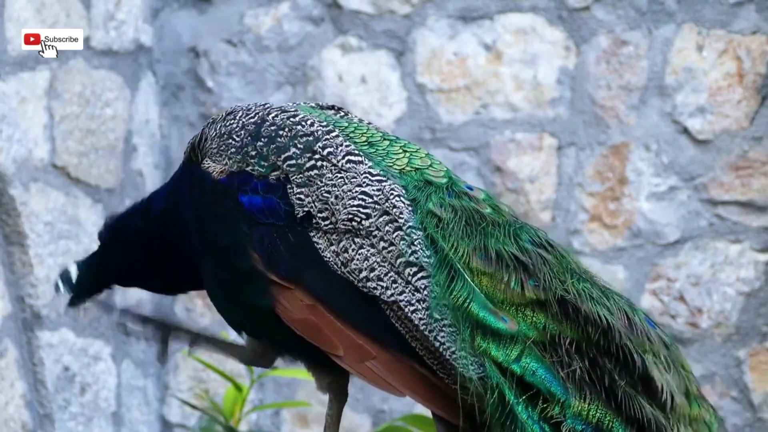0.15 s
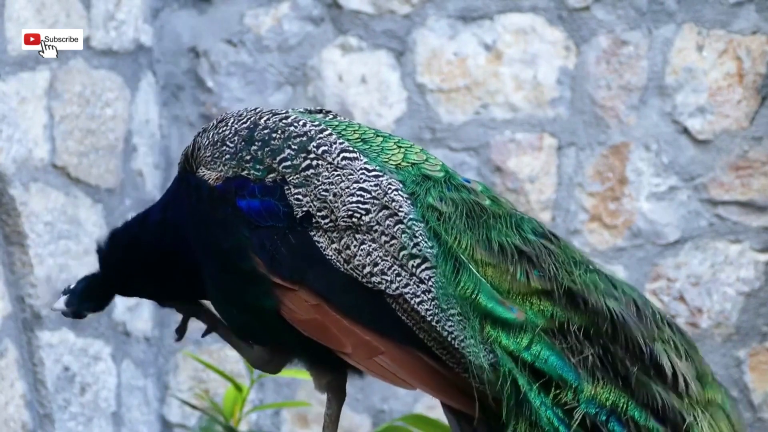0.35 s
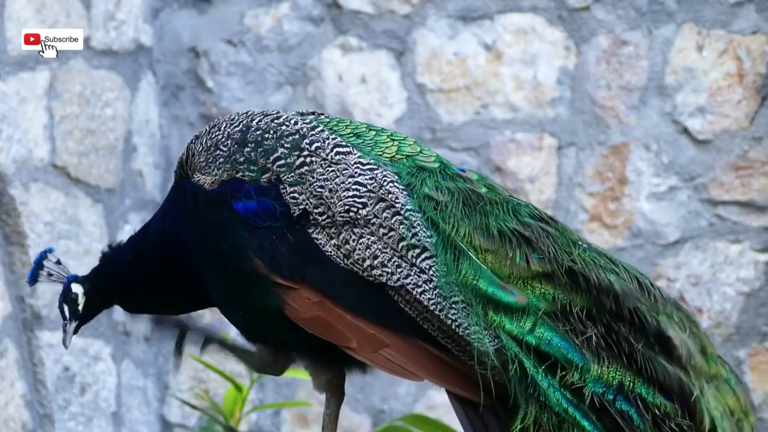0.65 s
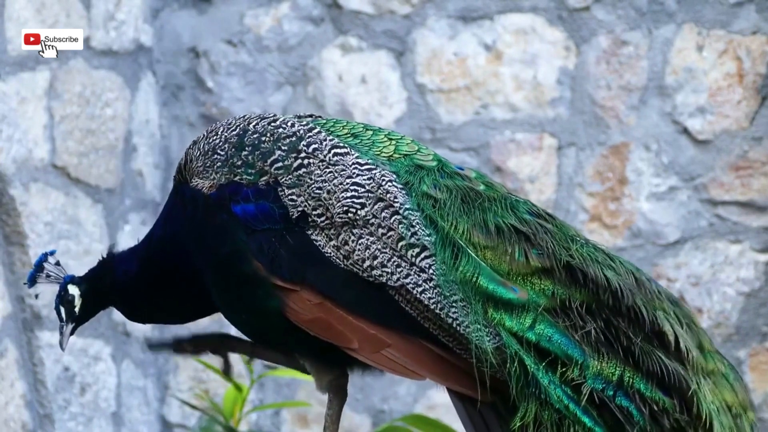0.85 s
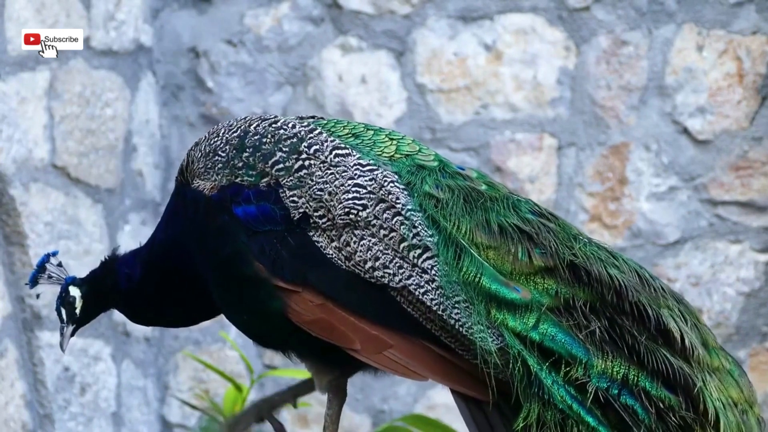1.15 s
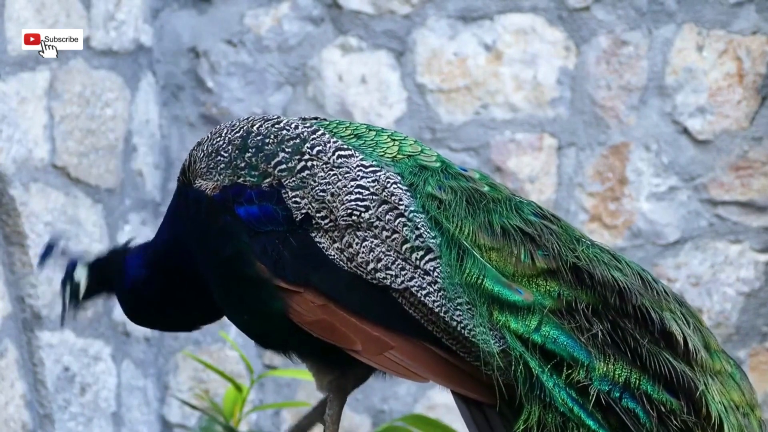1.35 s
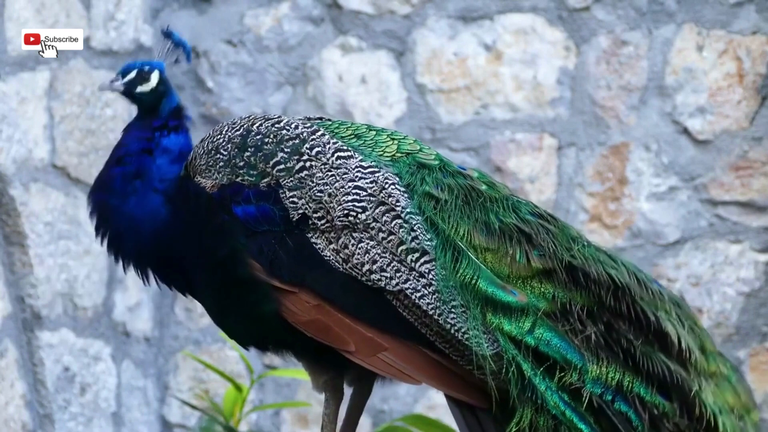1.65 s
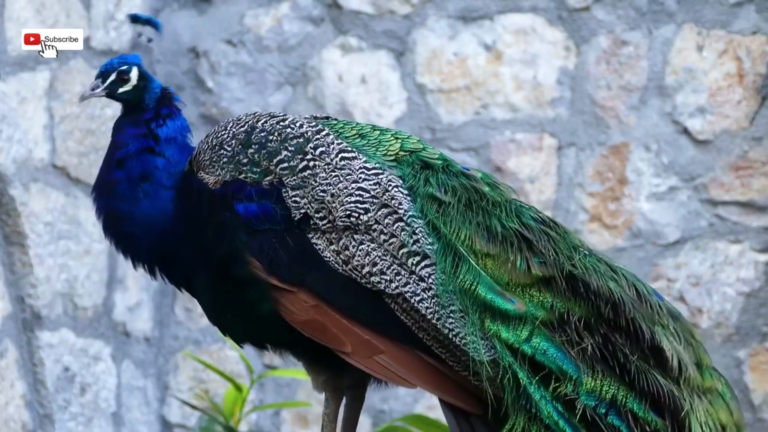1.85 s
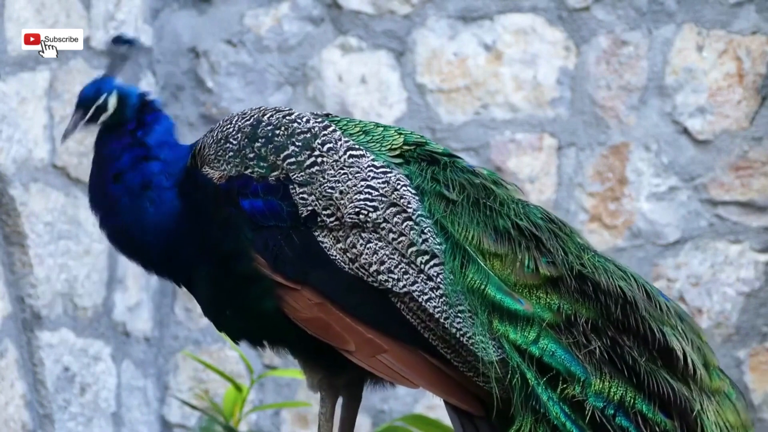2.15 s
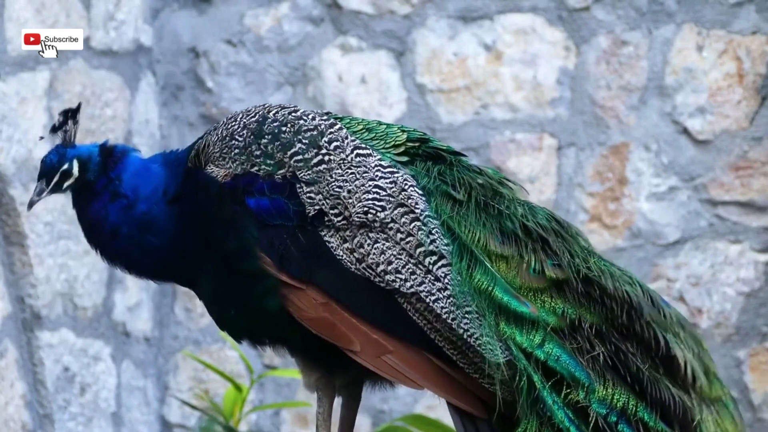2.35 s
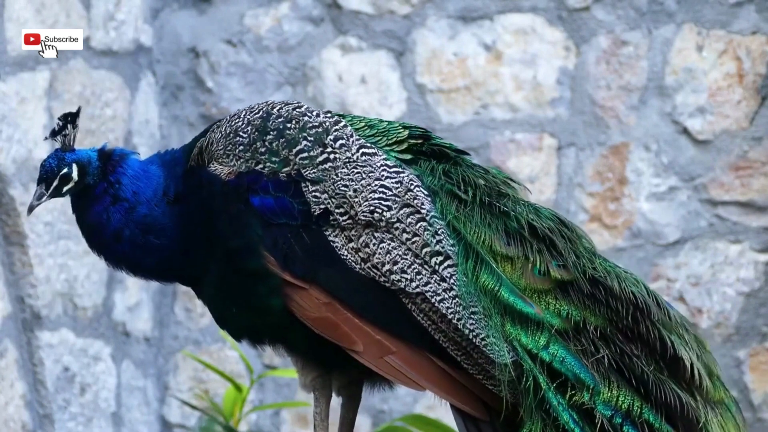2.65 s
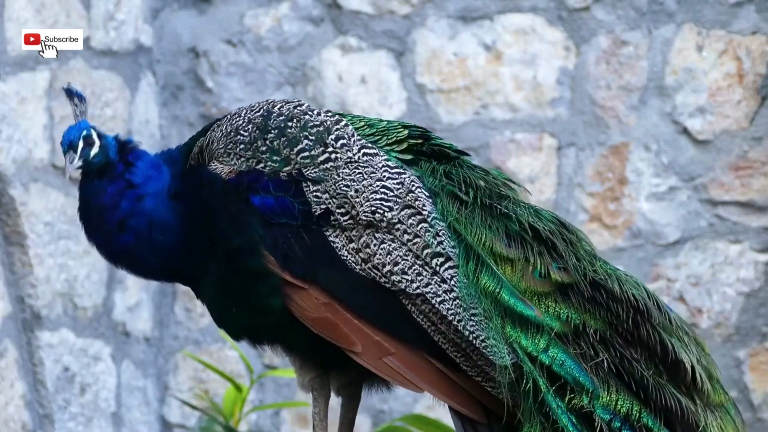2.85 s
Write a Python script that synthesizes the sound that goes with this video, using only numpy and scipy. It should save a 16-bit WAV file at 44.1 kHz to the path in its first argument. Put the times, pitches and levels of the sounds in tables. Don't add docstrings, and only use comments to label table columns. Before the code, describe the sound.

Two shrill arching peacock screams ring through a walled yard over faint traffic and birds

```python
import sys
import numpy as np
from scipy import signal
from scipy.fft import rfft, irfft, next_fast_len
from scipy.io import wavfile
from scipy.ndimage import uniform_filter1d, minimum_filter1d

SR = 44100
rng = np.random.default_rng(int(sys.argv[2]) if len(sys.argv) > 2 else 0)


def wav_record(signal):
    frames = np.transpose(np.atleast_2d(signal))
    bounded = np.clip(frames, -1, 1)
    quanta = np.round(bounded * 32767).astype(np.int16)
    wavfile.write(sys.argv[1], SR, quanta)


def volts_from_db(level):
    exponent = np.asarray(level, float) / 20
    return 10 ** exponent


N = 132300

# time [s], level [dB].
LEAF_SWELL = [(0, -68), (.95, -64), (1.3, -55.5), (1.75, -52), (2.0, -54), (2.8, -67), (3, -79)]


def evened(x):
    return x / np.sqrt(np.mean(x ** 2) + 1e-20)


def read(points, hz):
    f, value = np.transpose(points)
    return np.interp(np.log(hz + 1), np.log(f + 1), value)


def curve(points):
    return volts_from_db(np.interp(np.arange(N) / SR, *np.transpose(points)))


def add(mix, s, sound):
    part = mix[round(s * SR):][:len(sound)]
    part += sound[:len(part)]


def wander(count, size):
    return evened(uniform_filter1d(uniform_filter1d(rng.standard_normal(count), size), size))


def band(x, hz, width):
    f = np.fft.rfftfreq(len(x), 1 / SR)
    return evened(irfft(rfft(x) * np.exp(-2 * ((f - hz) / width) ** 2), len(x)))


def colour(x, points):
    size = next_fast_len(len(x) + 4096)
    gain = volts_from_db(read(points, np.fft.rfftfreq(size, 1 / SR)))
    return irfft(rfft(x, size) * gain, size)[:len(x)]


def hanging_cry():
    # frequency [Hz], width [Hz], level [dB].
    partials = [(2450, 50, -8), (2640, 30, -6), (2850, 40, -8), (3100, 40, -7), (3215, 45, -2),
                (3530, 40, -1), (3880, 40, -12), (4090, 40, -14)]
    level_db, t60_s, wash_db = -22.5, 0.81, -9.5
    noise = rng.standard_normal(N)
    lines = evened(sum(volts_from_db(db) * band(noise, hz, width) for hz, width, db in partials))
    wash = volts_from_db(wash_db) * band(rng.standard_normal(N), 2900, 1800)
    return (lines + wash) * volts_from_db(level_db - 60 * np.arange(N) / SR / t60_s)


def traffic():
    # frequency [Hz], density [dB per Hz].
    rumble = [(25, -28), (55, 3), (100, -8.5), (200, -4), (500, -13), (2500, -23.5), (6000, -40.5),
              (12000, -75)]
    frames, hz = N // 256 + 5, np.fft.rfftfreq(1024, 1 / SR)
    real, imag, patches = rng.standard_normal((frames, 513, 3)).T
    patches = uniform_filter1d(patches, size=8, axis=0)
    patches = evened(uniform_filter1d(patches, size=12, axis=1))
    level_db = read(rumble, hz)[:, None] + 1.15 * patches + 0.52 * wander(frames, size=20)
    z = (real + 1j * imag) * volts_from_db(level_db)
    return volts_from_db(-31) * evened(signal.istft(z, nperseg=1024, noverlap=768)[1][:N])


def hum():
    # time [s], level [dB].
    swell = [(0, -39.5), (.06, -39.5), (.3, -46.5), (1.2, -39.5), (1.3, -36), (1.55, -49.5), (1.82, -32),
             (1.92, -35.5), (2.04, -29.5), (2.3, -38.5), (2.85, -37), (3, -33.5)]
    centre_hz, waver_hz = 166, 4
    turns = np.cumsum(centre_hz + waver_hz * wander(N, size=1500)) / SR
    return curve(swell) * np.sqrt(2) * np.sin(2 * np.pi * turns)


def leaves():
    return curve(LEAF_SWELL) * band(rng.standard_normal(N), 7400, 1500)


def whistle(length, hz, glide, db):
    u = np.linspace(0, 1, round(length * SR))
    turns = np.cumsum(hz + glide * (u - .5)) / SR
    return volts_from_db(db) * np.sin(np.pi * u) ** .5 * np.sin(2 * np.pi * turns)


def far_flock():
    # time [s], level [dB].
    chatter = [(0, -59.5), (.95, -55.5), (1.2, -41), (1.65, -41.5), (1.85, -45.5), (2.05, -44.5),
               (2.8, -54.5), (3, -52)]
    low_hz, high_hz = 2500, 4610
    blur = np.zeros(N)
    for when, length, pitch, glide, loudness in rng.random((2400, 5)):
        hz = low_hz + (high_hz - low_hz) * pitch
        note = whistle(.015 + .04 * length, hz, 120 * (glide - .6), 9 * loudness ** 3)
        add(blur, when * N / SR, note)
    return curve(chatter) * evened(blur)


def cry(rows, throat, pipe):
    attack_s, release_s = 0.0068, 0.02
    jitter, shimmer_db, breath_db = 0.00096, 1.5, -39
    s, pitch, effort_db, even_db, tilt_db = np.transpose(rows)
    t = np.arange(s[0], s[-1], 1 / SR)
    n = len(t)
    hz = uniform_filter1d(np.interp(t, s, pitch), size=1300, mode="nearest")
    hz = hz * (1 + jitter * wander(n, size=150))
    turns, out = np.cumsum(hz) / SR, np.zeros(n)
    even_db, tilt_db = np.interp(t, s, even_db), np.interp(t, s, tilt_db)
    for k in range(1, 21):
        level_db = sum(db / (1 + (2 * (k * hz - f) / width) ** 2) for f, width, db in pipe)
        level_db = level_db + even_db * (k in (2, 4)) + tilt_db * np.log2(max(k, 3) / 3)
        breath = volts_from_db(breath_db) * wander(n, size=40)
        level_db = read(throat, k * hz) + level_db + shimmer_db * wander(n, size=500)
        out += (1 + breath) * volts_from_db(level_db) * np.sin(2 * np.pi * (k * turns + rng.random()))
    out /= np.sqrt(uniform_filter1d(out ** 2, size=3000))
    edge = np.clip(np.minimum((t - s[0]) / attack_s, (s[-1] - t) / release_s), 0, 1)
    return s[0], out * edge * volts_from_db(np.interp(t, s, effort_db))


def yard(x):
    # delay [s], level [dB].
    slaps = [
        (.0063, -29.5),
        (.0131, -11),
        (.0212, -10),
        (.034, -16.5),
        (.050, -10.5),
        (0.077, -17.5),
    ]
    # frequency [Hz], t60 [s].
    decay = [(600, 2.1), (1500, 2.7), (2500, 1.34), (4000, 1.5), (6000, 0.29), (10000, 1)]
    # frequency [Hz], level [dB].
    stone = [(600, -31), (1400, -8), (2500, -3.5), (4000, 0.5), (6000, 0), (12000, -11)]
    near_db, near_t60_s, near_end_s, near_share = -12, .6, .075, .12
    far_db = -19.5
    size = 2 * SR
    time = np.arange(size) / SR
    taps = np.zeros(size)
    at = np.arange(300, size - 20, 20) + rng.integers(0, 20, (size - 301) // 20)
    taps[at] = rng.choice([-1., 1.], at.shape)
    near = taps * (rng.random(size) < near_share) * volts_from_db(-60 * time / near_t60_s)
    near = near / (1 + (time / near_end_s) ** 8)
    hz, t, z = signal.stft(taps, SR, nperseg=256)
    z = z * volts_from_db(-60 * t / read(decay, hz)[:, None])
    far = signal.istft(z, SR, nperseg=256)[1][:size]
    echo = volts_from_db(near_db) * near / np.linalg.norm(near) + volts_from_db(far_db) * far / np.linalg.norm(far)
    for s, db in slaps:
        echo[round(s * SR)] += volts_from_db(db)
    echo = colour(np.roll(echo, 200), stone)
    return x + signal.fftconvolve(x, echo)[200:N + 200]


def songbirds():
    # start [s], length [s], pitch [Hz], glide [Hz], level [dB].
    song = [(1.04, .03, 5900, -100, -63), (1.304, .06, 2460, -28, -41), (1.386, .025, 4100, -400, -33),
            (1.41, .04, 3500, 11.5, -37), (1.475, .05, 3490, 22, -32), (1.54, .02, 4380, 10, -45),
            (1.566, .03, 3300, -61, -37.5), (1.627, .05, 3080, 1.5, -34.5), (1.705, .035, 3070, -12, -47),
            (1.86, .03, 2850, 117, -37), (1.969, .02, 3650, 49.5, -34), (1.978, .02, 4080, 15.5, -46),
            (2.001, .025, 2750, -300, -30.5)]
    out = np.zeros(N)
    for s, length, hz, glide, db in song:
        add(out, s, whistle(length, hz, glide, db - 3))
    return out


def scene():
    # time [s], pitch [Hz], effort [dB], even-harmonic lift [dB], brightness [dB per octave].
    cries = [
        [(.185, 637.6, -20, 3.5, -10), (.25, 706, -9.5, 3.5, 2), (.345, 798.7, -6, -6, -0.5),
         (.42, 819, -1.5, -14, 3), (.511, 822, -.5, -16, -3.6), (.617, 808.1, -4.5, -2, 2.6),
         (.765, 716.4, -12, -1.5, -2), (.805, 669, -9, 4.5, -4), (.83, 590, -17, 7.5, -5.5)],
        [(2.058, 656.4, -22, 3.5, 5), (2.153, 677.8, -11, -1, -5.5), (2.215, 849, -10.5, 11.5, 9),
         (2.265, 883.5, -8.5, 20, 17), (2.375, 899.5, -7.5, 10, 13.5), (2.44, 884, -6, 2.5, 10.5),
         (2.62, 763.7, -7.5, 2, 4.7), (2.705, 686.3, -12, -1.5, -0.5), (2.735, 593, -23.5, -1.5, 2.5)],
    ]
    # frequency [Hz], level [dB].
    throats = [
        [(600, -20.5), (830, -15), (1400, -7.5), (2500, -2), (4000, -14.5), (6300, -26.5), (10000, -25.5),
         (15000, -42.5)],
        [(600, -34.5), (900, 6), (1400, -1), (2500, -1), (4000, -8.5), (6300, -26.5), (10000, -29.5),
         (15000, -47.5)],
    ]
    # frequency [Hz], width [Hz], lift [dB].
    pipes = [
        [(2410, 100, 7), (3220, 81, -0.5), (3617, 120, 11), (4100, 170, 6.5), (4710, 83, 6.5), (5460, 130, 8),
         (7490, 740, -19.5)],
        [(2504, 486, 14.5), (3551, 143, -15), (4280, 393, 8), (5440, 420, 12.5), (6237, 100, 11.5),
         (7300, 550, -17)],
    ]
    peacock = np.zeros(N)
    for rows, throat, pipe in zip(cries, throats, pipes):
        add(peacock, *cry(rows, throat, pipe))
    birds = songbirds() + far_flock()
    background = traffic() + hum() + leaves()
    return (volts_from_db(6) * yard(peacock) + birds + volts_from_db(2.5) * background + hanging_cry())[None]


def ducked(x):
    knee_db, squeeze, hold_s, recover_db_s = -20, 0.43, 0.013, 308
    power_db = 10 * np.log10(abs(uniform_filter1d(x ** 2, size=900)) + 1e-12)
    hold = round(hold_s * SR)
    power_db = -minimum_filter1d(-power_db, hold, origin=(hold - 1) // 2)
    fall = np.arange(N) * recover_db_s / SR
    held_db = np.maximum.accumulate(power_db + fall) - fall
    over_db = np.maximum(held_db - knee_db, 0)
    return x * volts_from_db(-squeeze * uniform_filter1d(over_db, size=600))


def preamp_hiss():
    swell = curve(LEAF_SWELL)
    hiss = volts_from_db(-82.5) * rng.standard_normal(N) * (1 + 6 * np.sqrt(swell / swell.max()))
    return colour(hiss, [(8000, -0.5), (11000, -3.5), (15000, -14)])


def top_cut(x):
    return signal.sosfilt(signal.butter(12, 15500, fs=SR, output="sos"), x)


def record(dry):
    # frequency [Hz], level [dB].
    rolloff = [(20, -25), (45, -0.5), (6100, -2.8), (6700, -10), (10500, -30), (11500, -34.5),
               (15000, -40.5)]
    ceiling = 1.05
    level = ducked(dry[0])
    soft = level / (1 + (level / ceiling) ** 6) ** (1 / 6)
    return top_cut((colour(soft, rolloff) + preamp_hiss())[None])


dry = scene()
out = record(dry)
wav_record(out)
```